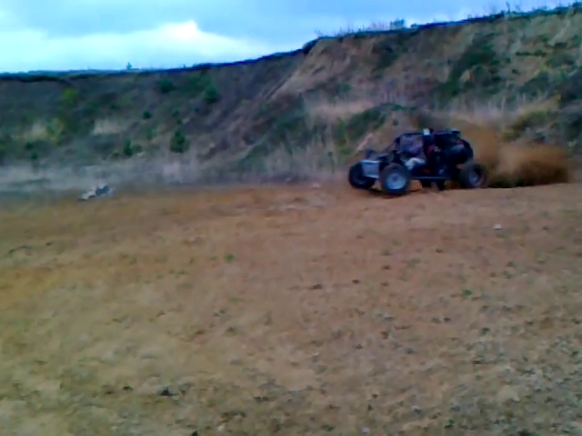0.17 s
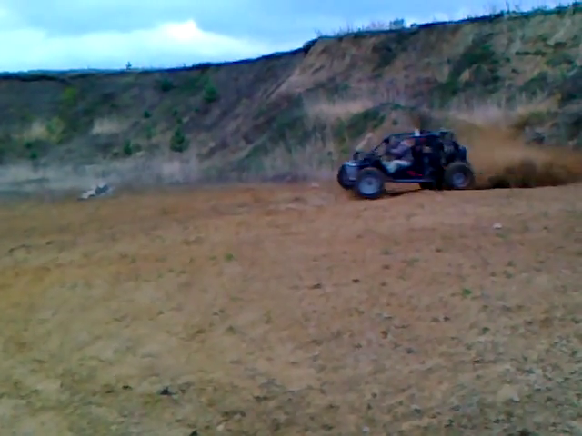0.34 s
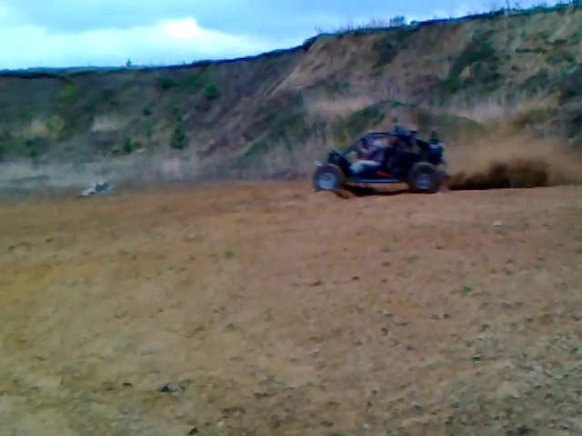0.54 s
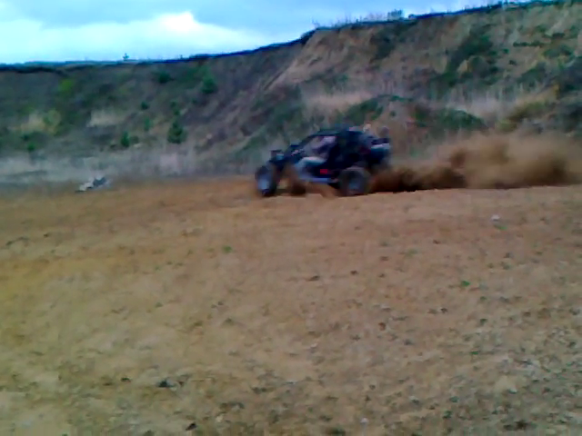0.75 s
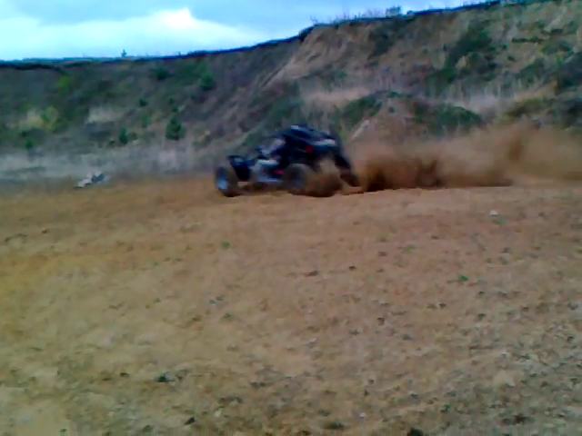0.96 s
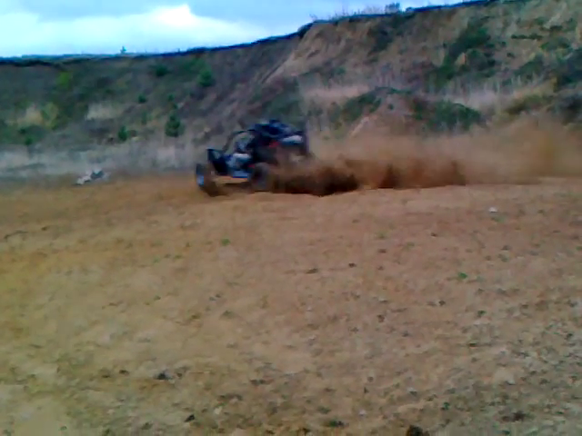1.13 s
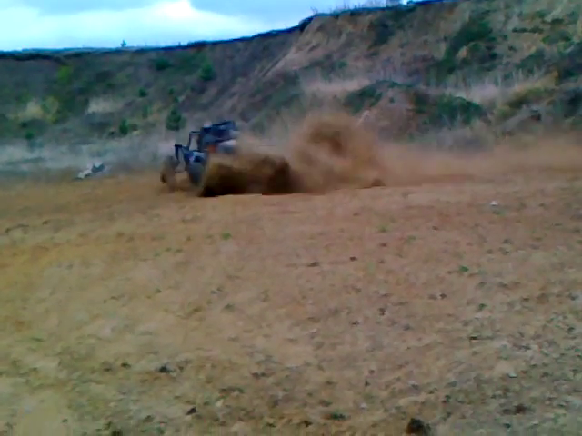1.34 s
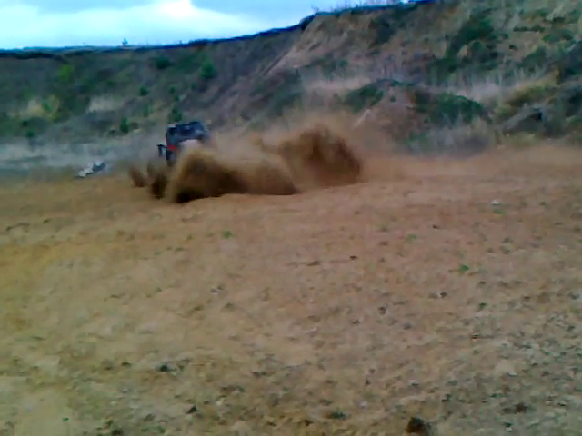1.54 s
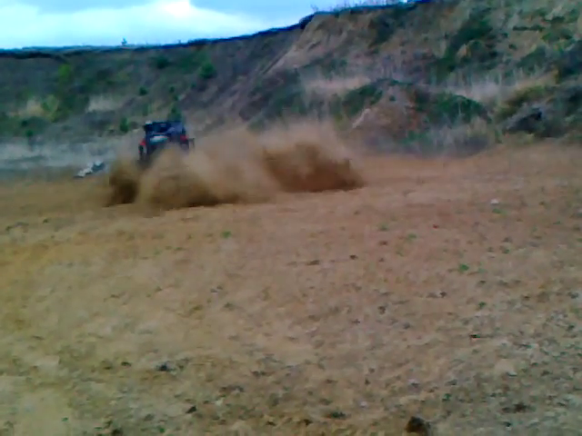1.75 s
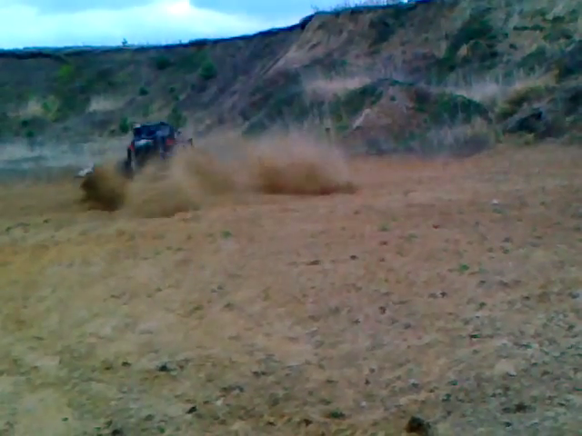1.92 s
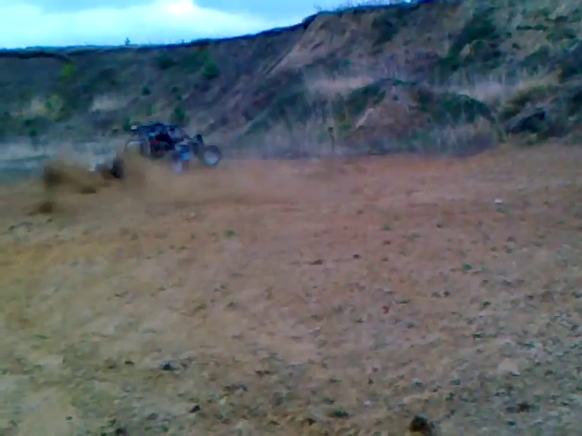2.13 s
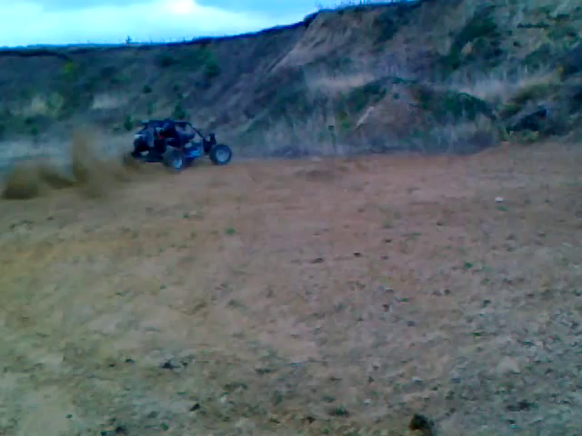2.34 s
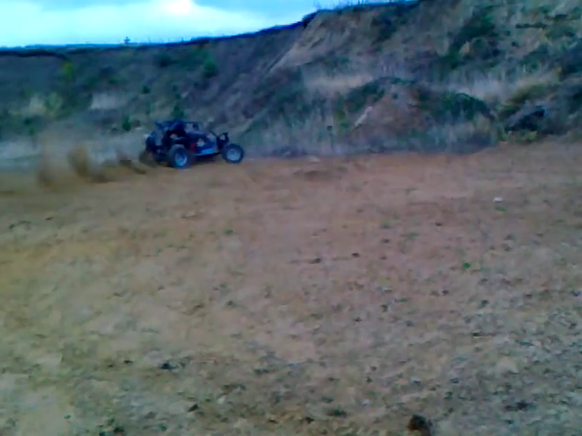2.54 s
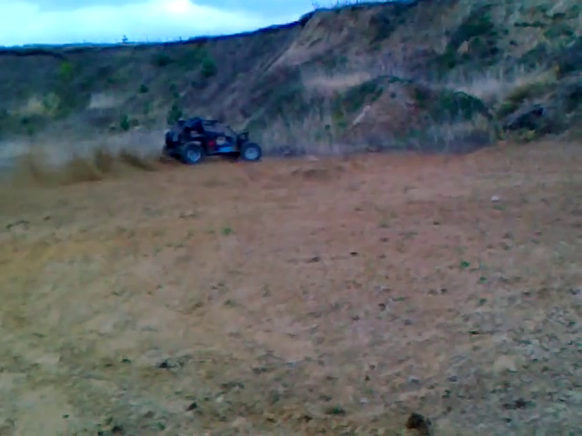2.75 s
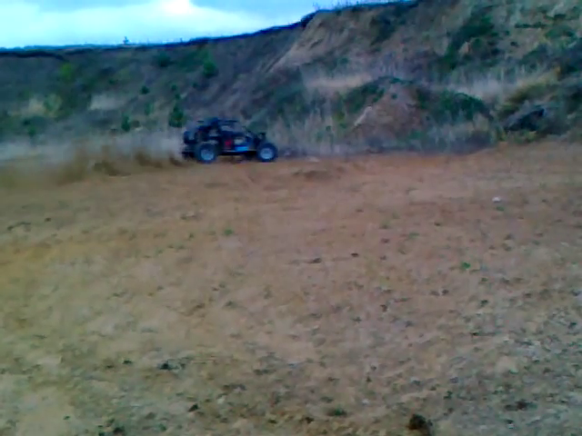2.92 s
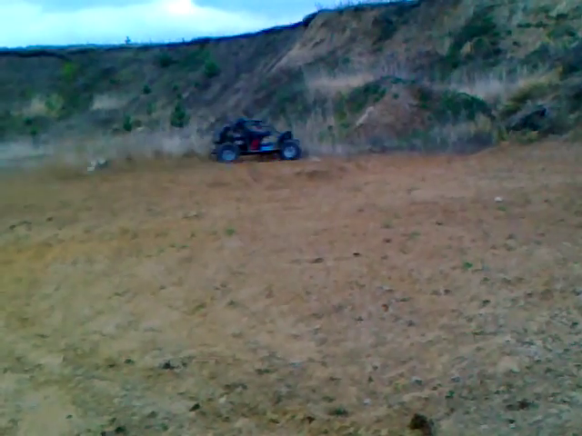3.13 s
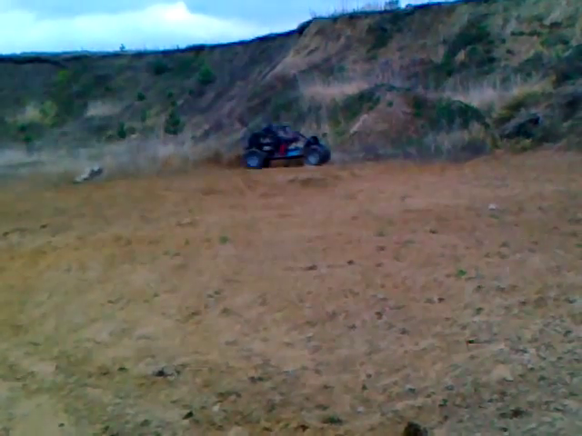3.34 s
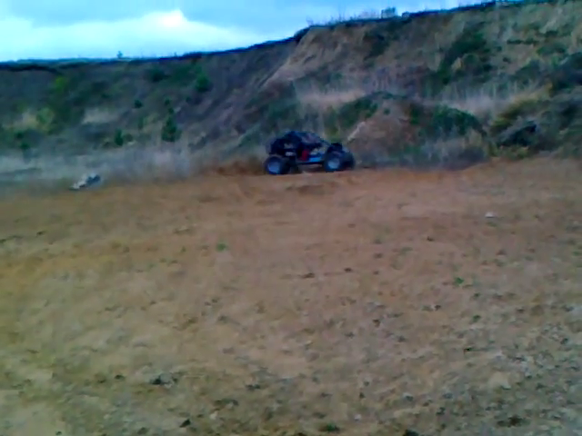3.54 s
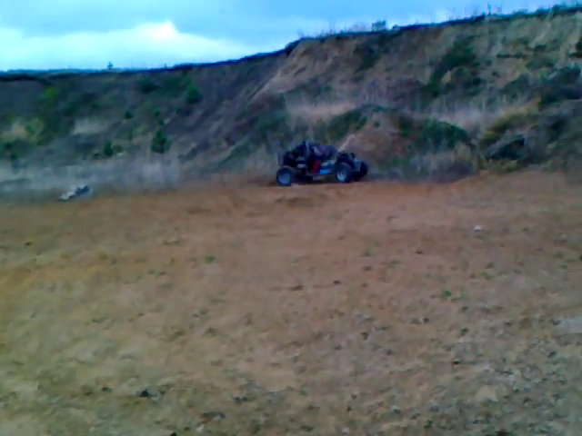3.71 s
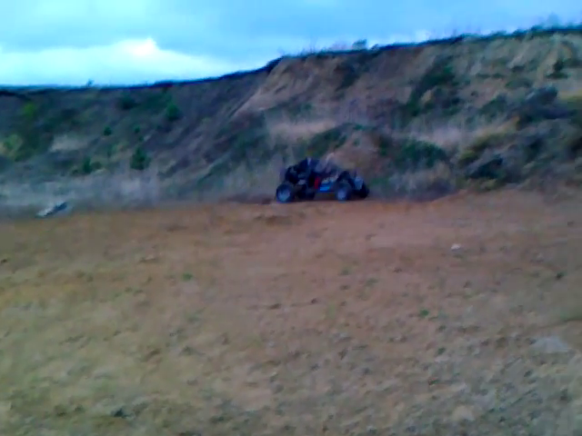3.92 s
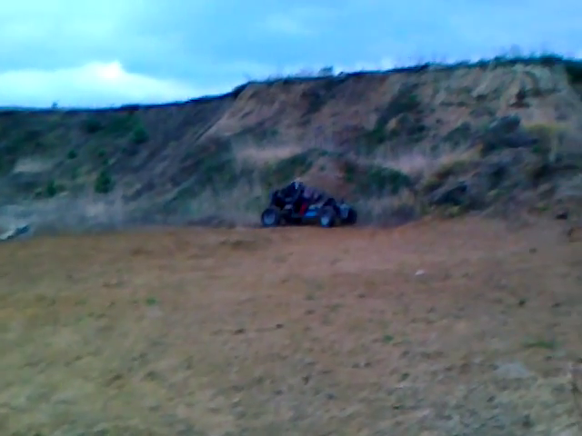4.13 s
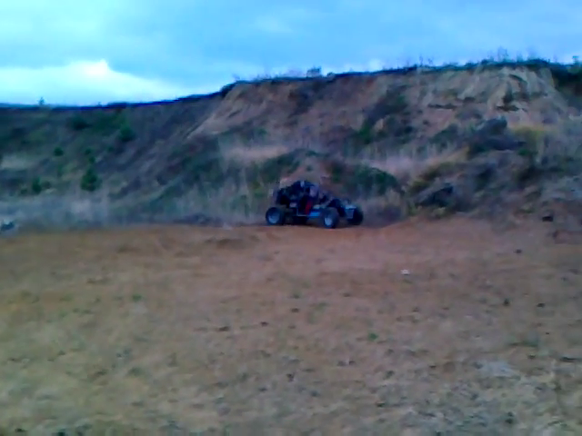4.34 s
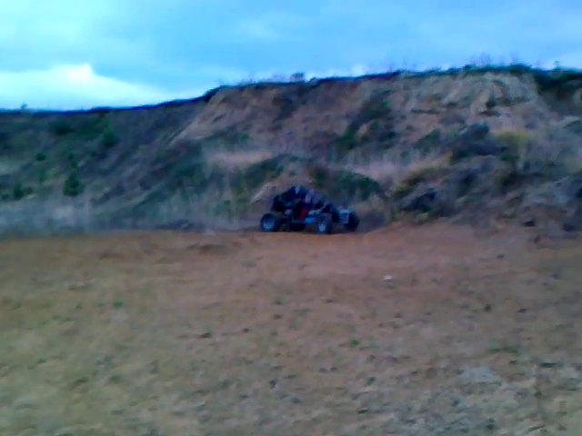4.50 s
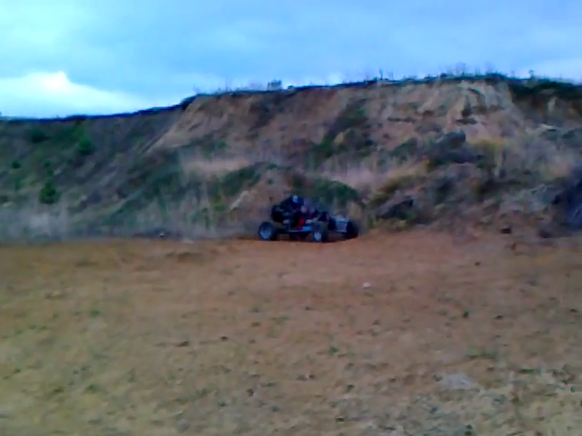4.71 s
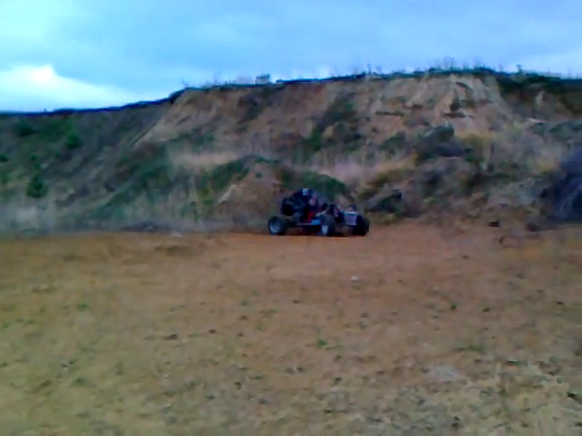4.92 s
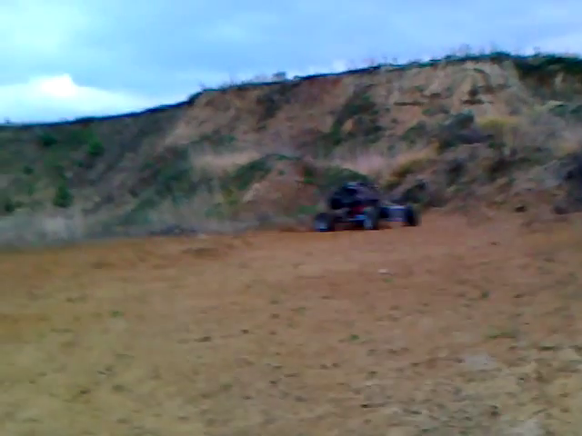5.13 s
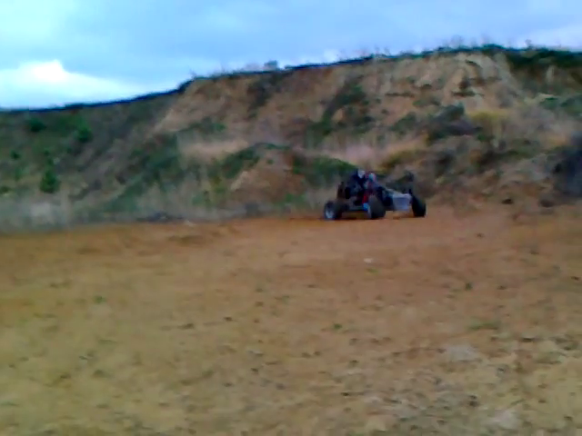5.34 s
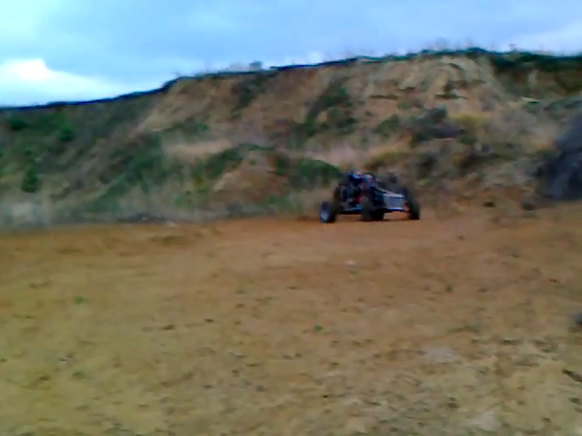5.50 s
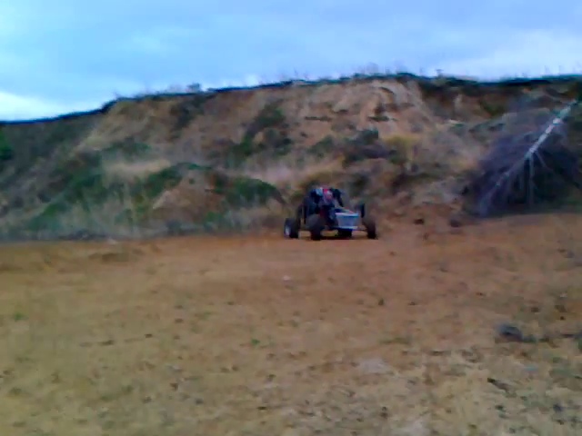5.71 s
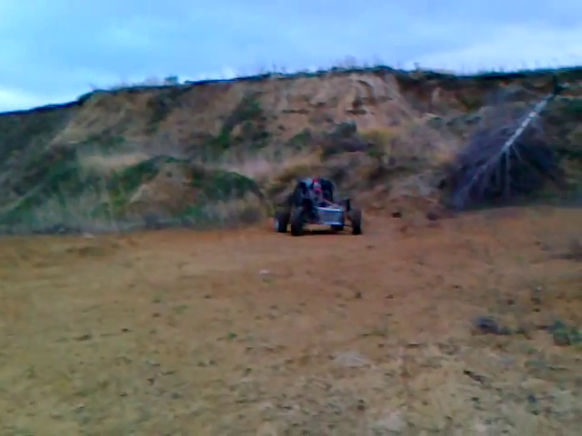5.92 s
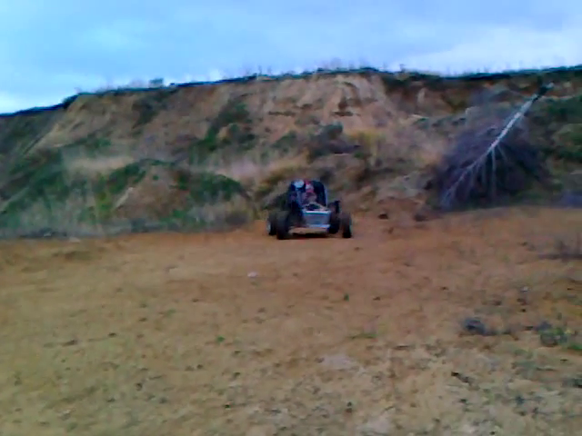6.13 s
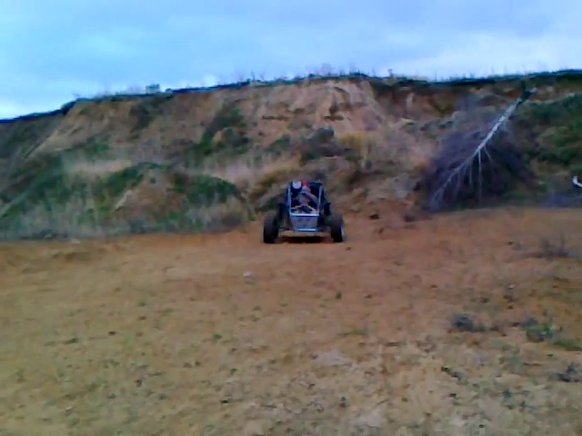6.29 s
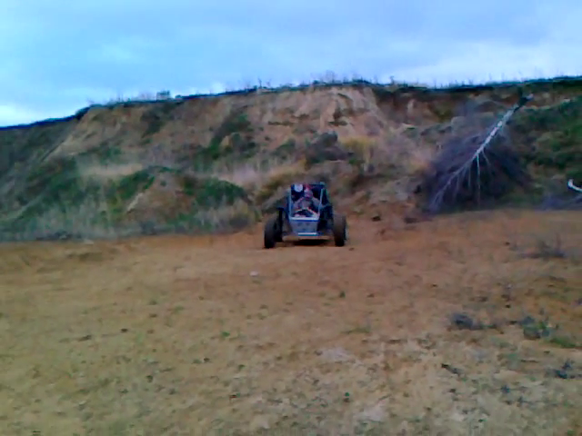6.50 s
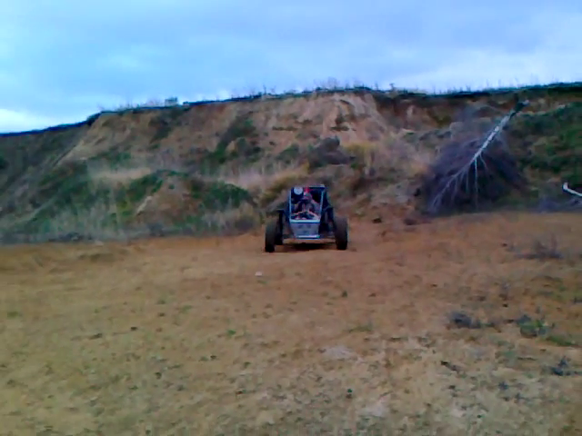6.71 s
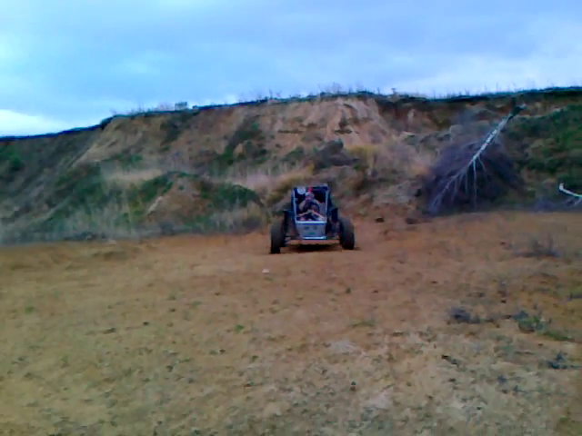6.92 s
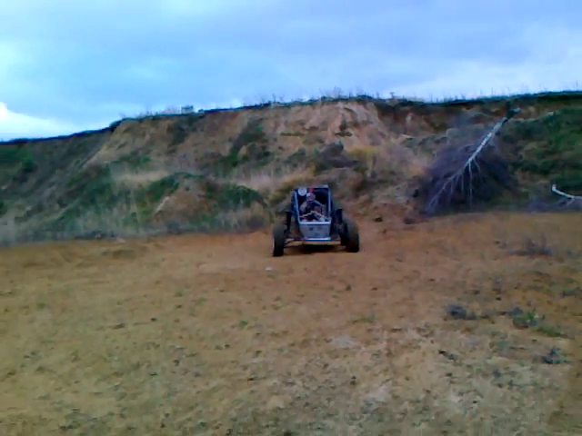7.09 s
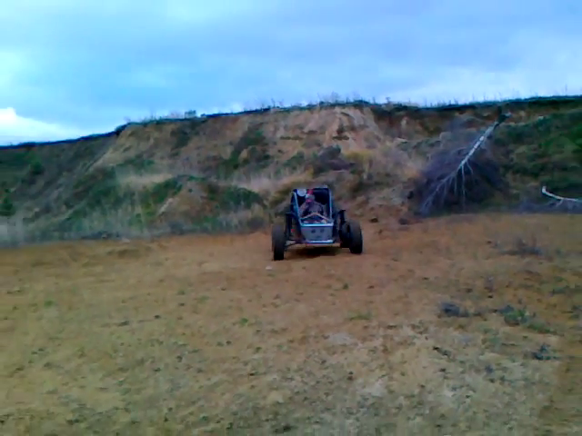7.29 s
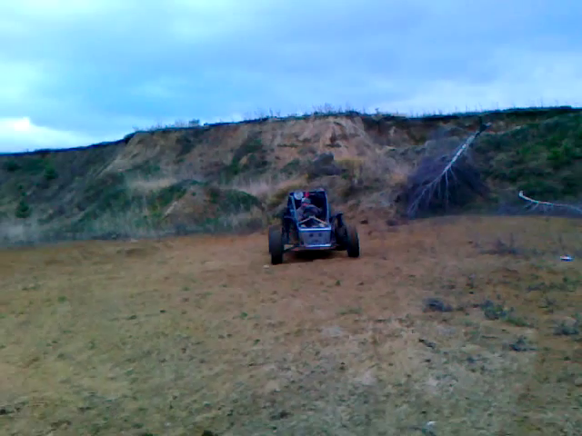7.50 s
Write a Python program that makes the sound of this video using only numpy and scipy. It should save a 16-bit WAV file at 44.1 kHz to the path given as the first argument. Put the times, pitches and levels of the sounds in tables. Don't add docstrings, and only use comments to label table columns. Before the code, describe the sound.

The sound begins mid-blare: a four-cylinder buggy engine at high revs, the tail of one throttle burst sagging at once. From about 0.2 to 0.9 s it catches again, booming and snarling; a brief lift, then the longest, highest and raspiest scream runs from 1.1 to 1.7 s, with a bright flick of sand at its start. A short stab follows around 2 s and a lower pull from 2.4 to 2.8 s. A stone knocks at 2.9 s, and the revs tumble into loose, quieter coasting, lowest and most ragged near 4.2 s amid small grit clicks. From 4.5 s the throttle picks up into a crisp moderate pull at 5.2 s, with faint sand hiss and several hard metallic knocks until about 6.1 s. It then eases into a breathy, uneven crawl with faint valve ticks until the end at about 7.5 s. Dull pit echoes and light wind rumble surround it.

```python
import sys
import numpy as np
from scipy import signal
from scipy.fft import rfft, irfft, next_fast_len
from scipy.io import wavfile
from scipy.ndimage import uniform_filter1d

SR = 44100
rng = np.random.default_rng(int(sys.argv[2]) if len(sys.argv) > 2 else 0)


def put_to_file(sound):
    columns = np.atleast_2d(sound).T
    safe = np.clip(columns, -1, 1)
    whole_steps = np.round(safe * 32767)
    wavfile.write(sys.argv[1], SR, whole_steps.astype(np.int16))


def how_loud(loudness_db):
    steps = np.asarray(loudness_db, float) / 20
    return 10 ** steps


N = 332948

# start_s, clean_orders_share (0-1), sharp_fronts_share (0-1), steady_jet_share (ratio)
ORDERLINESS = [
    (0, .9, .7, .6),
    (2.9, .9, .7, .6),
    (3.3, .65, .3, 1),
    (4.3, .55, .5, .7),
    (4.5, .75, 1, .15),
    (5.2, .8, .9, .25),
    (6.1, .75, .4, .7),
    (6.5, .45, .15, 1.5),
    (7.55, .4, .15, 1.5),
]


def engine():
    rate = firing_rate()
    drone_db, boom_db, bark_db, snarl_db, rasp_db, hiss_db = levels(rate)
    clean, sharp, steady = in_time(ORDERLINESS)
    turn = np.cumsum(rate) / SR
    count = np.arange(int(turn[-1]))
    at = np.interp(count, turn, np.arange(N))
    period = SR / rate[at.astype(int)]
    unevenness, pattern = cylinder_pattern(rate, at, count)

    drone, boom, bark = silencer(rate, at, period, count, unevenness, pattern)
    tone = how_loud(drone_db - 2) * evened(drone, .08)
    tone += how_loud(boom_db) * evened(boom, .04)
    tone += how_loud(bark_db) * evened(bark, .04)

    fronts, puff = gas_puffs(at, period, count, pattern)
    rasp_gas, hiss_gas, snarl_gas = rng.standard_normal((3, N)) * (puff + steady * [[1], [.5], [1]])
    rough = evened(causal_colour(snarl_gas, SNARL_SPECTRUM), .1)
    upper = clean * evened(snarl(turn, rate, clean), .1) + (1 - clean) * rough
    rasp = tailpipe(sharp * evened(fronts, .1) + .55 * evened(rasp_gas, .1))
    jet = how_loud(snarl_db) * evened(upper, .05)
    jet += how_loud(rasp_db) * evened(rasp, .06)
    jet += how_loud(hiss_db) * evened(shell_hiss(hiss_gas), .1)
    return tone, jet


# climb_s, sag_start_s, grip_after_s, grip_pitch_hz, top_pitch_hz
BURSTS = [
    (.16, .92, .3, 146, 152),
    (1.15, 1.66, .27, 157.5, 160.5),
    (1.92, 2.22, .2, 150.5, 151),
    (2.42, 2.82, .12, 139.5, 144),
]
# start_s, firing_rate_hz
COAST = [(3.07, 116.5), (3.22, 112), (3.51, 83), (3.67, 72.5), (3.9, 67.3), (4.09, 61), (4.22, 53),
         (4.59, 62), (4.75, 74.5), (5.0, 79.3), (5.22, 85.5), (5.6, 87.3), (6.1, 75.7), (6.28, 74.5),
         (6.57, 68.2), (6.73, 68.5), (7.07, 61.5), (7.55, 61.5)]


def firing_rate():
    bog_hz, flywheel_s = 129.5, .05
    s, hz, sag_hz_per_s = 0, 157, 230
    corners = [(0.00031, hz)]
    for climb, shut, grip, grip_hz, top_hz in BURSTS:
        bottom = min(climb - .001, s + (hz - bog_hz) / sag_hz_per_s)
        low_hz = hz - sag_hz_per_s * (bottom - s)
        corners += [(bottom, low_hz), (climb, low_hz), (climb + grip, grip_hz), (shut, top_hz)]
        s, hz, sag_hz_per_s = shut, top_hz, 108
    return uniform_filter1d(in_time(corners + COAST)[0], int(flywheel_s * SR))


# shut_s, open_s, depth (0-1)
LIFTS = [
    (-.02, 0.118, 0.57),
    (0.862, 0.984, 0.81),
    (1.671, 1.916, 0.97),
    (2.201, 2.342, 0.75),
    (2.52, 2.605, 0.55),
    (2.828, 2.96, 0.15),
]
LIFT_LOSS = {"boom": -5, "bark": -13.5, "snarl": -10.5, "rasp": -15, "hiss": -21.5}
# start_s, boom_level_db, bark_over_boom_db
EXHAUST = [(0, -19, 0.5), (.3, -15.5, -9.5), (.55, -14, -1), (1.15, -13.5, -5.5), (1.5, -13, -10),
           (2.05, -16.5, 2), (2.75, -17, 2.5), (2.97, -20.5, -6.5), (3.2, -21.5, -15.5),
           (3.34, -34.5, -2.5), (3.46, -28, -3.5), (3.57, -20.5, -2), (4.1, -18, -9), (4.7, -17.5, -2.5),
           (5.5, -20, -1.5), (5.85, -15.5, -3.5), (6.4, -17.5, -5), (7.55, -16.5, -4.5)]
# start_s, rasp_level_db, hiss_over_rasp_db
JET = [(0, -31, -13), (.35, -23, -13), (.85, -22, -15), (1.1, -21, -8), (1.5, -16.5, -13.5),
       (2.1, -20, -12), (2.75, -22.5, -13.5), (2.97, -34.5, -13.5), (3.3, -39, -17.5), (4.2, -40, -14),
       (4.65, -31.5, -12), (5.12, -28.5, -8), (5.32, -35.5, -9.5), (5.75, -34, -9), (6.0, -39, -17),
       (6.4, -43.5, -21.5), (6.7, -47, -15.5), (7.55, -46, -15.5)]
# middle_s, level_change_db
RUTS = [(.61, -7), (.75, -8), (0.878, -6), (1.22, -6), (1.43, -10), (1.57, 3.5), (1.7, 4), (2.06, -8),
        (2.231, -3), (2.84, -1), (3.09, -6), (4.138, -5), (4.69, 0), (5.42, 0), (5.64, -3), (6.64, 2.5)]


def levels(rate):
    shut_s, open_s, rut_half_s = 0.15, 0.083, 0.036
    t = np.arange(N) / SR
    shut = sum(depth * np.interp(t, [s, min(s + shut_s, end - .001), end, end + open_s], [0, 1, 1, 0])
               for s, end, depth in LIFTS)
    rut_db = sum(dip_db * np.maximum(1 - np.abs(t - s) / rut_half_s, 0) for s, dip_db in RUTS)
    near_db, heading_db = in_time(EXHAUST)
    effort_db, facing_db = in_time(JET)

    drone_db = np.interp(rate, [90, 125], [-30, -33.5]) + 3 * drift(8)
    drone_db += -13 * np.maximum(1 - np.abs(t - 6.25) / 0.74, 0)
    boom_db = near_db + rut_db + LIFT_LOSS["boom"] * shut
    bark_db = near_db + heading_db + .4 * rut_db + LIFT_LOSS["bark"] * shut + 1.12 * drift(4.5)

    sputter_db = 1.12 * drift(9.4)
    snarl_db = -33 + 6.5 * np.log2(rate / 100)
    snarl_db += .4 * (near_db + 20) + 0.32 * (effort_db + 34) + 0.067 * heading_db
    snarl_db += 3 * np.exp(-t / 0.16)
    snarl_db += LIFT_LOSS["snarl"] * shut + sputter_db
    rasp_db = effort_db + LIFT_LOSS["rasp"] * shut + sputter_db
    hiss_db = effort_db + facing_db + LIFT_LOSS["hiss"] * shut + 1.24 * sputter_db
    return drone_db, boom_db, bark_db, snarl_db, rasp_db, hiss_db


def cylinder_pattern(rate, at, count):
    unevenness = np.interp(rate, [90, 110, 127], [0.2, 0.61, 0.21]) * how_loud(1.5 * drift(1))
    unevenness = unevenness[at.astype(int)]
    one_in_four = 0.031 * 2 * np.cos(np.pi / 2 * count + .6)
    return unevenness, 1 + unevenness * (-1.) ** count + one_in_four


# pitch_hz, level_db
SILENCER = [(40, -24.5), (70, -5), (110, 11), (150, 7.5), (230, 8.5), (300, 0.5), (350, -7.5), (420, -53.5),
            (600, -29), (3000, -120)]


def silencer(rate, at, period, count, unevenness, pattern):
    jitter, strength = rng.standard_normal((2, len(at)))
    main = pulses(at + .005 * period * jitter, -pattern * how_loud(.5 * strength))
    repeat = np.interp(rate[at.astype(int)], [90, 105], [1, 0.1])
    branch = pulses(at + 0.23 * period, -repeat * unevenness * (-1.) ** count)
    thump = causal_colour(branch + main, SILENCER)
    drone, low = [signal.sosfiltfilt(signal.butter(7, hz, fs=SR, output="sos"), thump) for hz in (97, 200)]
    return drone, low - drone, thump - low


def gas_puffs(at, period, count, pattern):
    jitter, strength = rng.standard_normal((2, len(at)))
    stagger = np.array([-0.0049, .05, -0.0395, 0.072])[count % 4]
    fronts = pulses(at + period * stagger + 2 * jitter, np.sqrt(np.abs(pattern)) * how_loud(2.0 * strength))
    puff = fronts
    for time_constant_s in (0.0071, 0.00046):
        puff = signal.lfilter([1], [1, -np.exp(-1 / (time_constant_s * SR))], puff)
    return fronts, evened(puff, 0.12)


# pitch_hz, level_db
SNARL_SPECTRUM = [(300, -15.5), (350, 2.5), (430, 0.5), (500, -10), (700, -15.5), (950, -5), (1200, -6.5),
                  (1500, -16.5), (1800, -37), (8000, -100)]
# start_s, order (multiples of firing rate)
FAVOURED = [(0, 3.8), (.2, 3.6), (.35, 4), (.9, 4), (1.05, 5), (1.4, 5.8), (1.75, 5.5), (2.0, 5.5),
            (2.35, 5), (2.85, 5.2), (3.0, 2.8), (3.4, 3.2), (3.6, 4.5), (4.3, 7), (5.1, 7), (5.7, 7.4),
            (6.2, 7.5), (7.55, 9)]


def snarl(turn, rate, clean):
    out, slow = np.zeros(N), slice(0, N, 200)
    coarse, favoured = np.arange(N) / 200, in_time(FAVOURED)[0][slow]
    revs = rate[slow] / 150
    steps = np.arange(len(revs))
    for n in range(9, 45):
        share = (.75 * revs, .4 * revs ** 3, .5, .4 * revs ** 3)[n % 4]
        favour_db = 9 * np.exp(-(np.log(n / 4 / favoured) / .11) ** 2)
        wander = rng.standard_normal((2, len(revs) + 200))
        wander = signal.lfilter([1], [1, -1.92, .9216], wander)[:, 200:]
        level_db = at_hz(SNARL_SPECTRUM, n / 4 * rate[slow]) + favour_db - .13 * n / revs
        height = share * how_loud(level_db + 3.5 * rms_one(wander[0]))
        blur = rng.random() * 2 * np.pi + n / 10 * (1 - clean[slow]) * rms_one(wander[1])
        phase = np.pi / 2 * n * turn + np.interp(coarse, steps, blur)
        out += np.interp(coarse, steps, height) * np.sin(phase)
    return out


# pitch_hz, width_hz, level_db
TAILPIPE = [(1389, 163, 0.5), (1532, 175, 4.5), (1660, 190, 5), (2090, 250, -0.5), (2244, 62, 5),
            (2403, 146, 1), (2630, 118, 1), (3090, 360, -8)]


def tailpipe(x):
    band = signal.butter(2, [1000, 3400], "band", fs=SR, output="sos")
    return signal.sosfilt(band, resonances(x, TAILPIPE, wander_db=2.0))


# pitch_hz, width_hz, level_db
SHELL = [(3510, 840, 2.5), (4017, 376, 5.5), (4760, 284, 0.5), (5400, 160, 3.5), (5940, 660, -4.5),
         (6610, 600, -2.5), (7190, 770, -5.5), (9300, 700, -24.5), (9025, 400, -22), (10960, 1900, -14.5),
         (13000, 6600, -22)]


def shell_hiss(gas):
    band = signal.butter(3, [3100, 15000], "band", fs=SR, output="sos")
    return signal.sosfilt(band, resonances(gas, SHELL, wander_db=1.5))


# pitch_hz, width_hz, level_db
TAPPETS = [(5450, 300, 0), (7600, 500, 5.5), (8800, 500, 0), (11500, 1500, -6)]


def tappets():
    turn = np.cumsum(firing_rate()) / SR / 2
    at = np.interp(np.arange(int(turn[-1])), turn, np.arange(N))
    jitter, strength = rng.standard_normal((2, len(at)))
    clicks = pulses(at + 60 * jitter, how_loud(5 * strength)) + .02 * rng.standard_normal(N)
    heard = np.arange(N) / SR > 6
    return how_loud(-66.5) * heard * rms_one(resonances(clicks, TAPPETS, wander_db=0.0))


# start_s, peak_db, top_pitch_hz, bright_part_db
GRIT = [(2.892, -16, 1619, -6), (4.227, -16.5, 1200, 7), (4.235, -20, 1650, 6), (4.331, -36, 2150, -20),
        (4.361, -33, 1190, -4), (4.37, -29.5, 2110, 11), (5.348, -12, 2060, 7.5), (5.473, -17, 1070, -15),
        (5.716, -13.5, 1650, -23), (5.768, -19, 1700, -28), (5.866, -24.5, 1377, 1),
        (5.949, -13, 1370, -19), (6.054, -9.5, 1760, -12), (6.154, -38, 1660, -5)]


def grit():
    out, t = np.zeros(N), np.arange(int(0.013 * SR)) / SR
    bright = signal.butter(2, [3300, 6300], "band", fs=SR, output="sos")
    for s, peak_db, hz, bright_db in GRIT:
        noise = rng.standard_normal((2, len(t)))
        body = signal.butter(3, [0.34 * hz, 1.35 * hz], "band", fs=SR, output="sos")
        knock = signal.sosfilt(body, (t == 0) * 2.6 + noise[0] * np.exp(-t / 0.0013))
        crack = signal.sosfilt(bright, (t == 0) * 6.1 + noise[1] * np.exp(-t / 0.0011))
        stone = knock / np.abs(knock).max() + how_loud(bright_db) * crack / np.abs(crack).max()
        i = round(s * SR)
        out[i:i + len(t)] += how_loud(peak_db) * stone
    return out


# start_s, length_s, pitch_hz, width_hz, level_db
SPRAY = [
    (1.065, 0.11, 4280, 690, -27.5),
    (5.146, 0.3, 8300, 7000, -50.5),
    (5.393, 0.62, 7960, 603, -55),
    (5.4, 0.61, 9850, 5040, -57),
    (6.15, 0.03, 13600, 400.2, -61),
]


def spray():
    out, t = np.zeros(N), np.arange(N) / SR
    for s, length, hz, width, level_db in SPRAY:
        grains = rng.standard_normal(N) * (rng.random(N) < .15)
        band = signal.butter(2, [hz - width / 2, hz + width / 2], "band", fs=SR, output="sos")
        swell = np.interp((t - s) / length, [0, .15, .7, 1], [0.062, 0.92, 0.89, 0])
        out += how_loud(level_db) * swell * rms_one(signal.sosfilt(band, grains))
    return out


# delay_s, level_db
PIT_ECHOES = [(0.033, -11.5), (0.073, -16), (.121, -11), (0.188, -15.5)]


def pit(x):
    dull = signal.sosfilt(signal.butter(1, 2500, fs=SR, output="sos"), x)
    return sum(how_loud(level_db) * np.pad(dull, (round(s * SR), 0))[:N] for s, level_db in PIT_ECHOES)


# pitch_hz, level_db
WIND_COLOUR = [(15, -27.5), (30, 16), (50, 18.5), (80, 3), (120, 14), (200, 20), (400, -56.5)]
# middle_s, half_length_s, level_db
GUSTS = [(0.198, 0.29, -38.5), (0.722, .15, -44), (1.8, 0.065, -37), (2.06, 0.29, -38.5), (2.497, .3, -42),
         (2.83, 0.106, -40), (3.292, 0.67, -43.5), (3.72, .1, -44.5), (3.862, 0.098, -41.5),
         (4.25, 0.16, -46.5), (4.53, 0.12, -37), (4.83, .1, -47.5), (7.048, 0.088, -42),
         (7.372, 0.077, -37.5)]


def wind():
    t = np.arange(N) / SR
    buffet_db = np.full(N, -55.0)
    for s, half, gust_db in GUSTS:
        buffet_db = np.maximum(buffet_db, gust_db - 6 * ((t - s) / half) ** 4)
    lumps = evened(causal_colour(rng.standard_normal(N), WIND_COLOUR), 0.14)
    return how_loud(buffet_db + 12.5 + 2.0 * drift(3.3)) * lumps


def rms_one(x):
    return x / np.sqrt(np.mean(x ** 2) + 1e-20)


def in_time(rows):
    s, *columns = np.transpose(rows)
    return [np.interp(np.arange(N) / SR, s, c) for c in columns]


def at_hz(points, hz):
    point_hz, level_db = np.transpose(points)
    return np.interp(np.log(hz), np.log(point_hz), level_db)


def evened(x, span_s):
    width = int(span_s * SR)
    power = uniform_filter1d(uniform_filter1d(x ** 2, width), width)
    return x / np.sqrt(power.clip(0) + 1e-12)


def drift(rate):
    r = np.exp(-80 * np.pi * rate / SR)
    slow = signal.lfilter([1], [1, -2 * r, r * r], rng.standard_normal(N // 40 + 1102))[1100:]
    return np.interp(np.arange(N) / 40, np.arange(len(slow)), rms_one(slow))


def causal_colour(x, points):
    size = next_fast_len(N + SR)
    hz = np.maximum(np.arange(size // 2 + 1) * SR / size, 1)
    cepstrum = irfft(np.log(how_loud(at_hz(points, hz))), size)
    cepstrum[1:size // 2] *= 2
    cepstrum[size // 2 + 1:] = 0
    return irfft(rfft(x, size) * np.exp(rfft(cepstrum)), size)[:N]


def resonances(x, modes, wander_db):
    out = np.zeros(N)
    for k, (hz, width, level_db) in enumerate(modes):
        r = np.exp(-np.pi * width / SR)
        ring = signal.lfilter([1, 0, -1], [1, -2 * r * np.cos(2 * np.pi * hz / SR), r * r], x)
        out += (-1) ** k * how_loud(level_db + wander_db * drift(3.7)) * (1 - r * r) / 2 * ring
    return out


def pulses(at, size):
    at = np.clip(at, 0, N - 2)
    whole = at.astype(int)
    part = at - whole
    return np.bincount(whole, size * (1 - part), N) + np.bincount(whole + 1, size * part, N)


def scene():
    tone, jet = engine()
    ground_share, ground_lag_s = .4, .00139
    ground = np.pad(jet, (round(ground_lag_s * SR), 0))[:N]
    jet = (jet + ground_share * ground) / np.hypot(1, ground_share)
    bright = jet + spray() + tappets()
    echoes = pit(how_loud(-13.5) * tone + how_loud(0.5) * bright)
    return (tone + bright + grit() + echoes + wind())[None]


def roll_off(x):
    return signal.sosfilt(signal.butter(12, 17140, fs=SR, output="sos"), x)


def record(dry):
    hush = how_loud(-85) * rms_one(signal.lfilter([1], [1, -.7], rng.standard_normal(dry.shape)))
    rounded = 1.012 * np.tanh((dry + hush) / 1.164)
    mix = signal.sosfilt(signal.butter(1, 22, "high", fs=SR, output="sos"), rounded)
    return roll_off(mix)


dry = scene()
out = record(dry)
put_to_file(out)
```